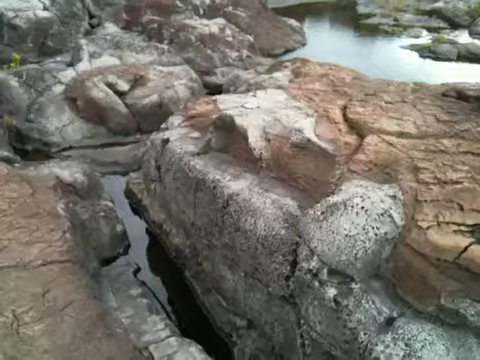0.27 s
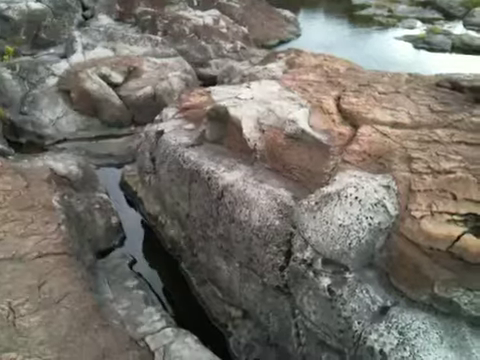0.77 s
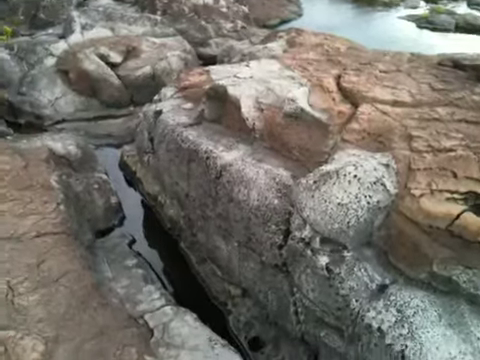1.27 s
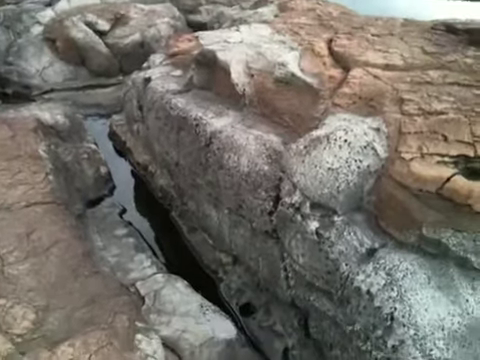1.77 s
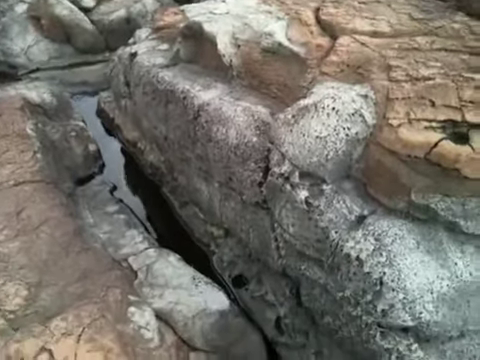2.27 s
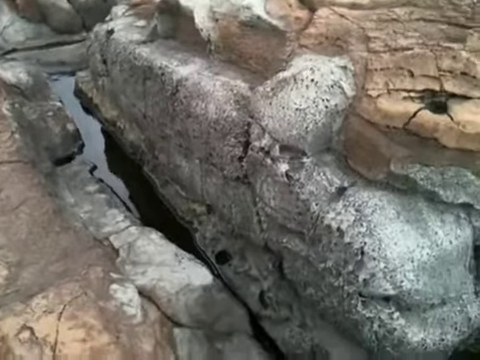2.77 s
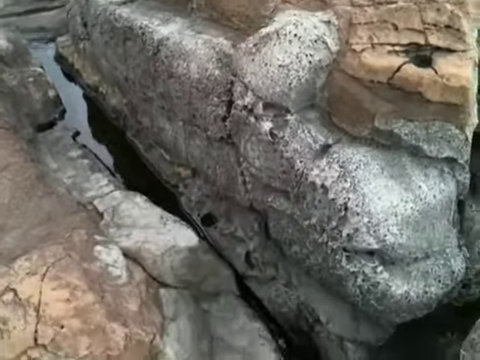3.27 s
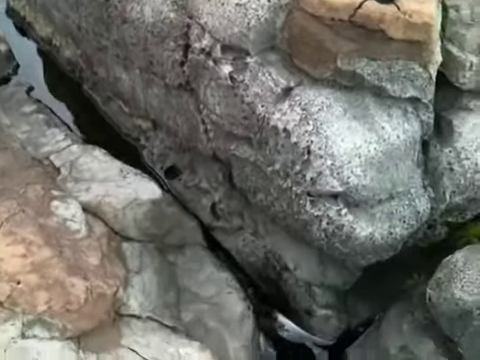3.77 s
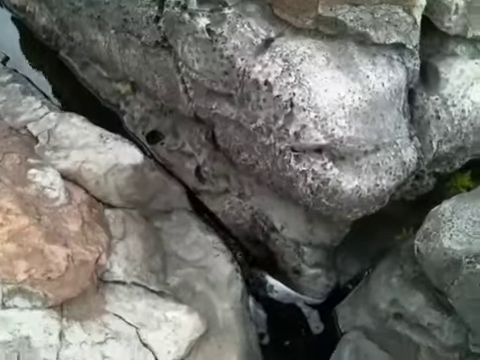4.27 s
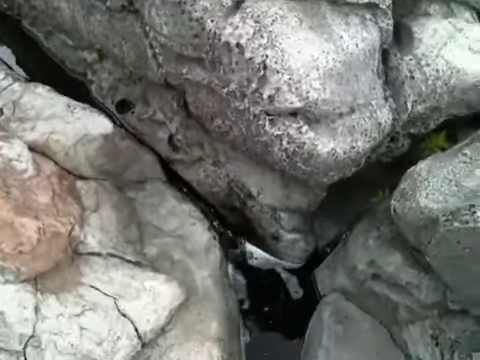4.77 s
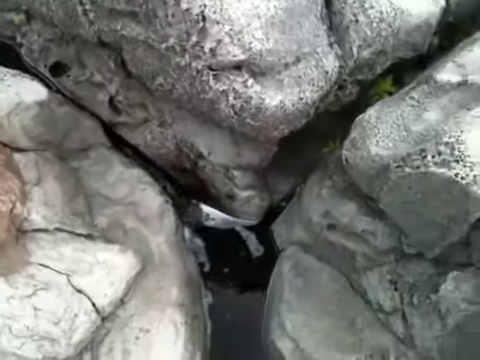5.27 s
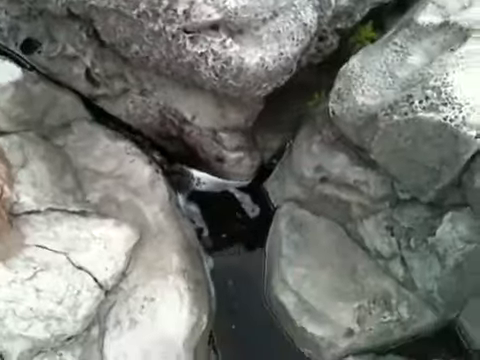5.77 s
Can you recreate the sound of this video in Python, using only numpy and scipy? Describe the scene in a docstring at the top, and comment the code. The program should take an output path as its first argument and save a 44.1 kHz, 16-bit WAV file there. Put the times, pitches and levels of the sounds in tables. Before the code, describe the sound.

Outdoors among shore rocks, a little water gurgles through a gap with high pinging bubbles, lower plops and tiny bright splashes. Low wind rumble comes and goes; a strong gust near the middle batters the unprotected microphone and briefly covers the water. Afterwards shorter bumps return between livelier bursts of gurgling. The sound is close and dry, with a thin watery hiss beneath and no long echo.

```python
"""A narrow rock crevice on an open shore: water trickles through it and a light gusty wind blows.
Wind rumble is moving bands of noise; single eddies are short low swings with ragged noise on them.
Water is a fizz of flickering noise bands, ringing sines for bubbles and noise bursts for drops.
Quick reflections off the rock follow the bubbles and splashes."""
import sys
import numpy as np
from scipy import signal
from scipy.io import wavfile
from scipy.ndimage import uniform_filter1d

SR = 44100
rng = np.random.default_rng(int(sys.argv[2]) if len(sys.argv) > 2 else 0)


def pcm_store(signal):
    """Save signal as 16-bit PCM."""
    levels = np.round(np.clip(np.atleast_2d(signal), -1, 1) * 32767)
    wavfile.write(sys.argv[1], SR, levels.astype(np.int16).T)


N = 266055

# wind strength, as rumble between thumps: time_s, level_db
WIND_STRENGTH = [(0.3, -50.5), (0.6, -51.5), (0.85, -44.5), (1.08, -51), (1.3, -45), (1.55, -48.5),
                 (1.72, -40.5), (1.9, -43.5), (2.2, -49.5), (2.55, -40.5), (2.65, -45), (2.76, -35.5),
                 (2.85, -31), (3.01, -30.5), (3.14, -28), (3.26, -30), (3.31, -40.5), (3.38, -42),
                 (3.75, -47), (3.92, -42.5), (4.0, -47.5), (4.12, -43.5), (4.33, -41), (4.42, -34.5),
                 (4.5, -62), (4.54, -59), (4.6, -35.5), (4.82, -47.5), (5.04, -51), (5.25, -45),
                 (5.45, -43), (5.6, -52.5), (5.81, -40), (6.03, -47.5)]
# spectral shape of the wind rumble: frequency_hz, density_db (per Hz)
RUMBLE_SPECTRUM = [(25, -6), (60, -31), (110, -2.5), (170, -2), (260, -2), (400, -7), (600, -25.5),
                   (1000, -65.5), (1500, -53), (2200, -83)]
# single eddies on the microphone, before its bass cut: height_s, peak_db, pitch_hz, half_length_s
EDDY_THUMPS = [(0.132, -30.5, 159, 0.012), (0.2063, -36.5, 193, 0.0051), (0.2311, -39.5, 171, 0.02),
               (0.3107, -36, 222, 0.0051), (0.4061, -37.5, 162, 0.0032), (0.4231, -31.5, 176, 0.0071),
               (0.4485, -31.5, 170, 0.0034), (0.4717, -43, 164, 0.011), (0.6592, -34, 140, 0.0042),
               (0.6878, -41, 188, 0.007), (0.7649, -38, 181, 0.013), (0.7909, -33, 186, 0.0057),
               (0.8091, -35, 186, 0.0038), (0.8615, -38.5, 180, 0.016), (0.8857, -30.5, 190, 0.003),
               (0.9159, -43, 189, 0.0066), (1.0619, -35, 190, 0.0048), (1.0871, -42, 194, 0.011),
               (1.2245, -31, 252, 0.0054), (1.271, -18, 198, 0.0031), (1.281, -20.5, 191, 0.0017),
               (1.3721, -26, 252, 0.0021), (1.4243, -31, 360, 0.0034), (1.4379, -28, 255, 0.0019),
               (1.4664, -30, 166, 0.0078), (1.5608, -31, 169, 0.0092), (1.5934, -26, 187, 0.0018),
               (1.647, -44, 260, 0.0046), (1.6995, -32, 148, 0.015), (1.7215, -23, 252, 0.0024),
               (1.7444, -23.5, 188, 0.0022), (1.7565, -37, 250, 0.0049), (1.8098, -32.5, 180, 0.0048),
               (1.8923, -28.5, 188, 0.0031), (1.9664, -48, 162, 0.0045), (2.0143, -28.5, 195, 0.0063),
               (2.0277, -33, 219, 0.003), (2.0717, -37, 190, 0.0044), (2.112, -29.5, 216, 0.0032),
               (2.2322, -26.5, 157, 0.0048), (2.343, -26.5, 200, 0.0043), (2.36, -29.5, 194, 0.003),
               (2.4565, -12.5, 228, 0.0022), (2.4866, -19, 255, 0.0017), (2.5005, -24.5, 346, 0.0054),
               (2.5163, -14, 211, 0.0026), (2.5277, -21, 219, 0.003), (2.5873, -13, 193, 0.0018),
               (2.5973, -24, 294, 0.0022), (2.686, -30, 303, 0.0032), (2.715, -21.5, 182, 0.027),
               (2.765, -21.5, 168, 0.0033), (2.782, -20, 200, 0.004), (2.8036, -22, 188, 0.0032),
               (2.8299, -23, 214, 0.008), (2.8401, -4, 199, 0.0027), (2.8519, -29, 219, 0.0018),
               (2.8687, -11, 184, 0.0019), (2.8825, -12, 380, 0.0014), (2.8975, -20, 140, 0.015),
               (2.9395, -17, 182, 0.016), (2.9778, -17, 182, 0.016), (2.9955, -25, 216, 0.0049),
               (3.0061, -8.5, 207, 0.0033), (3.0218, -19, 212, 0.0085), (3.0351, -17, 162, 0.0056),
               (3.0499, -10.5, 188, 0.0044), (3.066, -18, 160, 0.012), (3.0844, -20, 190, 0.013),
               (3.1041, -19, 250, 0.0057), (3.1211, -21.5, 196, 0.015), (3.1401, -21, 257, 0.0034),
               (3.1633, -17, 167, 0.01), (3.1825, -11, 228, 0.0031), (3.1932, -11.7, 202, 0.0025),
               (3.2206, -13, 177, 0.011), (3.2367, -21, 197, 0.0065), (3.2537, -17.5, 170, 0.011),
               (3.286, -18.5, 200, 0.0022), (3.3565, -20.5, 260, 0.0032), (3.341, -24, 200, 0.004),
               (3.378, -25, 250, 0.0022), (3.395, -31, 220, 0.004), (3.4621, -25.5, 187, 0.004),
               (3.5388, -24, 253, 0.0018), (3.5531, -31, 137, 0.016), (3.5916, -28, 188, 0.0038),
               (3.6209, -29, 219, 0.004), (3.6678, -29.5, 159, 0.0075), (3.6955, -26, 219, 0.0026),
               (3.7079, -33, 140, 0.011), (3.7444, -27.0, 185, 0.0075), (3.7558, -24, 257, 0.0011),
               (3.8492, -20, 245, 0.0018), (3.9739, -20, 208, 0.0044), (3.988, -18, 205, 0.0064),
               (4.0166, -9, 363, 0.0011), (4.0265, -24, 169, 0.0083), (4.0556, -26.5, 168, 0.0076),
               (4.246, -15.5, 221, 0.0015), (4.2635, -20, 162, 0.0047), (4.2816, -16, 288, 0.0016),
               (4.3057, -21, 162, 0.0057), (4.3161, -16.5, 192, 0.0066), (4.344, -28, 200, 0.004),
               (4.354, -30, 330, 0.0019), (4.37, -38, 170, 0.006), (4.392, -23.5, 330, 0.0031),
               (4.4095, -35, 226, 0.011), (4.4197, -17.5, 222, 0.0072), (4.4297, -29, 135, 0.0077),
               (4.447, -34, 187, 0.0028), (4.556, -27.5, 303, 0.0041), (4.5717, -18, 162, 0.0069),
               (4.5855, -20.5, 191, 0.0032), (4.602, -22, 188, 0.0019), (4.6184, -15.5, 235, 0.0029),
               (4.6283, -18, 188, 0.001), (4.6655, -21, 190, 0.0041), (4.7308, -21.5, 191, 0.0044),
               (4.771, -30, 160, 0.004), (4.815, -27.5, 147, 0.0051), (4.853, -30, 219, 0.0038),
               (4.875, -41, 200, 0.0026), (4.9893, -25, 216, 0.0029), (5.0628, -33, 192, 0.0068),
               (5.1508, -33.5, 252, 0.0039), (5.171, -33, 138, 0.015), (5.2313, -45, 188, 0.0041),
               (5.2415, -31, 258, 0.008), (5.2517, -22.5, 159, 0.0078), (5.307, -40, 193, 0.0078),
               (5.4184, -33, 220, 0.0025), (5.4345, -26, 294, 0.0023), (5.4474, -38, 187, 0.0048),
               (5.471, -35, 191, 0.0037), (5.6395, -18.5, 295, 0.0015), (5.7229, -15, 185, 0.0039),
               (5.8113, -15.5, 165, 0.0042), (5.8408, -25.5, 218, 0.0035), (5.876, -22, 336, 0.0024),
               (5.8884, -30, 158, 0.012), (5.9073, -24, 192, 0.0035), (5.9626, -25, 160, 0.0046)]
# sharp eddies torn off the microphone's rim, before its bass cut: height_s, peak_db, pitch_hz, half_length_s
RIM_SNAPS = [(1.331, -40, 600, 0.0018), (1.3739, -29.5, 554, 0.0023), (1.4596, -40, 576, 0.0025),
             (1.7229, -32.5, 637, 0.0028), (2.4549, -26.5, 574, 0.0012), (2.455, -36.5, 1100, 0.0039),
             (2.4853, -33, 606, 0.0014), (2.4975, -35, 613, 0.0012), (2.5054, -33, 513, 0.0032),
             (2.5846, -37, 504, 0.0057), (2.7118, -30.5, 520, 0.0028), (2.8159, -27, 517, 0.0031),
             (2.824, -22, 610, 0.0018), (2.8361, -18.5, 490, 0.004), (2.8385, -29, 1480, 0.00085),
             (2.844, -29, 514, 0.011), (2.8576, -26, 610, 0.0028), (2.861, -38, 1180, 0.0014),
             (2.8757, -23.5, 513, 0.0011), (2.8841, -42, 722, 0.0018), (2.9154, -26, 725, 0.0015),
             (2.9272, -21.5, 493, 0.0062), (2.9375, -37, 1280, 0.00053), (2.9376, -18, 710, 0.0014),
             (2.9637, -28, 520, 0.0044), (2.9937, -23, 613, 0.0013), (3.0039, -29.5, 513, 0.0054),
             (3.0152, -21.5, 507, 0.0045), (3.0333, -35, 613, 0.0037), (3.0465, -23, 1600, 0.00021),
             (3.0472, -13, 680, 0.0011), (3.0753, -27, 514, 0.0025), (3.0952, -28, 520, 0.0041),
             (3.1041, -21.5, 596, 0.0019), (3.1254, -24, 617, 0.0011), (3.134, -30, 510, 0.004),
             (3.1512, -40, 505, 0.0023), (3.1594, -14, 487, 0.0014), (3.16, -40, 1200, 0.0011),
             (3.1778, -22.5, 630, 0.0015), (3.1868, -17.5, 482, 0.0044), (3.1989, -34, 500, 0.0047),
             (3.2193, -11.5, 564, 0.00087), (3.2195, -34, 1280, 0.0043), (3.2272, -22, 610, 0.0014),
             (3.242, -15.5, 570, 0.0011), (3.243, -41, 1150, 0.0007), (3.2592, -34, 610, 0.0019),
             (3.4601, -33.5, 526, 0.0036), (3.984, -32, 980, 0.00068), (3.9857, -17, 495, 0.0045),
             (3.9937, -19, 630, 0.0017), (4.0172, -20, 600, 0.0019), (4.2431, -37, 613, 0.0026),
             (4.2569, -27, 490, 0.002), (4.2651, -30.5, 600, 0.0013), (4.2762, -40, 610, 0.0028),
             (4.3107, -44, 520, 0.0051), (4.3188, -30, 484, 0.0022), (4.3918, -34, 590, 0.0024),
             (4.4156, -34, 585, 0.0032), (4.5753, -32, 507, 0.0034), (4.5832, -27.5, 620, 0.0008),
             (4.6145, -28, 477, 0.0022), (4.6245, -27.5, 504, 0.0017), (5.0168, -33.5, 486, 0.0016),
             (5.6392, -28, 605, 0.0014), (5.7213, -33, 676, 0.0012), (5.8066, -40, 550, 0.0042),
             (5.8401, -33, 607, 0.002), (5.8769, -31, 584, 0.0035)]
# strength of the trickle: time_s, level_db
FLOW_STRENGTH = [(0.15, -52), (0.7, -52), (1.5, -52.5), (2.58, -50.5), (3.0, -51), (3.7, -50.5),
                 (4.48, -49), (5.2, -50.5), (6.03, -49.5)]
# spectral shape of the fizz: frequency_hz, density_db (per Hz)
FIZZ_SPECTRUM = [(290, -31), (500, 0.5), (810, -2.5), (980, 8.5), (1330, -13), (1640, -5), (4760, -12),
                 (7060, -30.5), (10500, -21), (15300, -37), (16500, -40)]
# level of small bubbles by pitch: pitch_hz, level_db
SMALL_BUBBLE_LEVEL = [(500, -22), (850, -33), (1220, -16), (1700, 1.5), (3000, 2), (5000, 6), (7000, -2.5)]
# loud bubbles: start_s, level_db (of the ringing tone), pitch_hz (at the start)
LOUD_BUBBLES = [(0.225, -45, 2700), (0.285, -39.5, 1570), (0.336, -33.5, 1960), (0.349, -35, 4130),
                (0.358, -36, 2120), (0.3635, -33.5, 3870), (0.413, -36, 1770), (0.4335, -35, 900),
                (0.4466, -37, 1850), (0.4925, -37.5, 1030), (0.554, -40, 1010), (0.45, -38, 920),
                (0.6246, -34, 2600), (0.711, -35, 1580), (0.733, -32.5, 1530), (0.734, -36, 2210),
                (0.762, -36, 3500), (0.794, -39, 4500), (0.843, -31.5, 1230), (0.882, -42, 2800),
                (0.973, -40, 5000), (0.978, -46, 2050), (0.906, -31, 3600), (0.9063, -34, 980),
                (0.946, -32.5, 3700), (1.038, -37, 880), (1.094, -33.5, 2550), (1.108, -36, 2070),
                (1.115, -42, 1980), (1.126, -45, 1700), (1.134, -39, 1600), (1.177, -50, 2700),
                (1.2023, -40, 995), (1.203, -37.5, 4350), (1.217, -41, 3400), (1.269, -33, 4020),
                (1.295, -35, 3470), (1.472, -41, 2520), (1.492, -43, 1880), (1.52, -36, 2550),
                (1.607, -37, 2570), (1.659, -41, 4900), (1.679, -40, 3660), (1.768, -41, 4830),
                (1.513, -34.5, 3160), (1.555, -37.5, 1210), (1.606, -38, 1420), (1.698, -31.5, 1155),
                (1.756, -39.5, 890), (1.829, -43, 1250), (1.872, -42, 1220), (1.947, -36, 1050),
                (2.018, -35.5, 1680), (2.066, -33, 2220), (2.081, -29, 4420), (2.163, -28.5, 5400),
                (2.167, -33.5, 1890), (2.269, -33.5, 2160), (2.298, -22, 4490), (2.388, -31.5, 2560),
                (2.658, -30.5, 2220), (2.81, -36, 2560), (3.032, -34, 2040), (3.481, -29.5, 5110),
                (3.625, -31, 1160), (3.672, -34.5, 3390), (3.757, -34.5, 1370), (3.842, -32, 1140),
                (3.8453, -32, 5200), (4.04, -32, 2030), (4.089, -30.5, 2030), (4.164, -31, 4420),
                (4.251, -27, 3910), (4.315, -30, 4050), (4.3778, -27, 5000), (4.399, -30, 1235),
                (4.423, -30, 1260), (4.44, -34.5, 910), (4.4426, -23.5, 5160), (4.544, -36, 1190),
                (4.5034, -22, 4860), (4.567, -31.5, 4300), (4.553, -34, 4200), (4.599, -37, 3930),
                (4.395, -41, 4140), (4.648, -36.5, 1230), (4.698, -28.5, 1000), (4.7019, -20, 1170),
                (4.752, -33, 4130), (4.806, -34.5, 3880), (4.851, -33, 1125), (4.877, -41, 1160),
                (4.919, -44, 1140), (4.966, -32.5, 1270), (5.031, -38, 770), (5.117, -41, 1170),
                (5.167, -38, 740), (5.01, -32.5, 3830), (5.085, -29.5, 1520), (5.113, -33.5, 4460),
                (5.26, -39, 3800), (5.282, -37, 2900), (5.078, -33.5, 2110), (5.183, -34.5, 1156),
                (5.333, -30, 1384), (5.384, -36.5, 960), (5.441, -35, 5040), (5.513, -26.5, 4850),
                (5.521, -30, 1540), (5.569, -36, 1260), (5.676, -28.5, 4540), (5.701, -35.5, 1280),
                (5.743, -31, 3520), (5.857, -35, 1180), (5.878, -35, 1260), (5.765, -33.5, 4690),
                (5.883, -31.5, 5370), (5.897, -21.5, 1116), (5.914, -28.5, 3210), (5.969, -31.5, 3980)]
# loud splashes of drops on rock: start_s, level_db (before band-passing), pitch_hz (within the bright band)
LOUD_SPLASHES = [(0.219, -58, 11000), (0.35, -45, 12000), (0.36, -44, 11000), (0.404, -39, 8600),
                 (0.744, -36, 10100), (0.823, -35, 9400), (0.9066, -33, 10400), (1.0377, -30.5, 8800),
                 (1.095, -36.5, 8950), (1.2545, -28, 9700), (1.4202, -29, 8800), (1.557, -35.5, 8300),
                 (1.703, -36.5, 9150), (1.7623, -42, 8900), (1.995, -27.5, 9900), (2.054, -42, 11500),
                 (2.067, -31, 8550), (2.192, -38, 9000), (2.161, -26.5, 9800), (2.296, -35, 8200),
                 (2.388, -37, 8750), (2.4386, -25.5, 8900), (2.845, -33.5, 9000), (3.047, -33, 6350),
                 (3.088, -40, 11200), (3.2032, -30, 8900), (3.2853, -28, 8950), (3.481, -35.5, 9100),
                 (3.621, -27, 11200), (3.733, -37, 10300), (4.06, -37, 10300), (4.243, -31, 7100),
                 (4.29, -41, 13500), (4.301, -40, 12000), (4.366, -34, 13500), (4.354, -35.5, 9500),
                 (4.375, -37, 6760), (4.441, -29, 9400), (4.502, -34, 9250), (4.556, -35, 7800),
                 (4.624, -35, 9000), (4.72, -38, 9900), (4.759, -31, 7860), (5.01, -39, 8000),
                 (5.2955, -29.5, 9100), (5.524, -41, 13400), (5.554, -28.5, 13900), (5.637, -30, 10100),
                 (5.709, -39, 11500), (5.766, -46, 9500), (5.814, -42, 9500), (5.8826, -30, 9600),
                 (5.9, -48, 8000), (5.913, -40, 10300), (5.941, -40, 11000), (5.996, -37, 11060)]

START_S, CUTOFF_HZ = .1195, 15900   # silence before this time; top of the spectrum
FAINT_THUMP_DB, FAINT_SPREAD_DB = 2, 1.5   # random eddies: offset from the wind strength, spread of sizes
TEAR_DB, TEAR_S = -9, .0012   # tearing noise: level re a rim snap before band-passing, extra half length
LOPSIDED, PORT_CUT_HZ = 0.44, 75   # phase bend that peaks a swing (radians); microphone's bass cut
BUBBLE_T60_S, RING_BY_SIZE = 0.033, 0.55   # loud bubbles: ring scale at 1 kHz, power of pitch shortening it
BUBBLE_ROUGH = 0.012   # least random phase step, cycles per sample
SNAP_DB, SNAP_S = -12, 0.00031   # tick at a loud bubble's or plop's birth: level re the tone; any tick's decay
SPLASH_T60_S = 0.0095   # loud splashes
PLOPS, PLOP_HZ, PLOP_OCTAVES = 28, 1158, 0.6   # pairs of gulps: count, centre of first pitch, full range
PLOP_DB, PLOP_T60_S = 9, 0.057   # offset re the flow before chance sizes, ring time
CLUSTER_DB, CLUSTER_HZ = 4, 17   # common level swing of small water: greatest swing, corner of its drift


def from_db(db):
    """Amplitude ratio of a level in decibels."""
    return 10 ** (np.asarray(db) / 20)


def rms_one(x):
    """Scales a signal to unit effective value."""
    return x / np.sqrt(np.mean(x ** 2) + 1e-20)


def in_time(rows):
    """Linear interpolation of a level at every sample."""
    s, value = np.transpose(rows)
    return np.interp(np.arange(N) / SR, s, value)


def at_hz(points, hz):
    """Interpolation of a level along logarithmic frequency."""
    table = np.array(points)
    return np.interp(np.log(hz), np.log(table[:, 0]), table[:, 1])


def band(x, low_hz, high_hz):
    """Band-pass filtering, with the upper edge kept below half the sample rate."""
    edges = [low_hz, min(high_hz, SR * .45)]
    return signal.sosfilt(signal.butter(2, edges, "band", fs=SR, output="sos"), x)


def drift(rate_hz):
    """Slow chance of unit rms: noise at every 20th sample through a double one-pole low-pass."""
    r = np.exp(-40 * np.pi * rate_hz / SR)
    noise = rng.standard_normal(N // 20 + 2002)
    slow = signal.lfilter([1], [1, -2 * r, r * r], noise)[2000:]   # drop the filter's build-up
    return np.interp(np.arange(N) / 20, np.arange(len(slow)), rms_one(slow))


def add(out, s, sound):
    """Superposition of a short sound from time s."""
    i = max(round(s * SR), 0)
    out[i:i + len(sound)] += sound[:max(N - i, 0)]


def banded_noise(spectrum, first_hz, count, gain_db):
    """Spectral shaping: half-octave noise bands under moving gains, with unit spread at 0 dB gain."""
    white = rng.standard_normal((2, N))   # alternated, so neighbouring bands use different noise
    edges = first_hz * 2 ** (np.arange(count + 1) / 2)
    still, moving = np.zeros(N), np.zeros(N)
    for k, (low_hz, high_hz) in enumerate(zip(edges, edges[1:])):
        hz = np.sqrt(low_hz * high_hz)
        noise = band(white[k % 2], low_hz, high_hz)
        shape_db = at_hz(spectrum, hz)
        still += from_db(shape_db) * noise
        moving += from_db(shape_db + gain_db(hz)) * noise
    return moving / np.std(still)


def rumble(lumpy_db, own_db, brighten, bass_share):
    """Turbulence comes in lumps: the stronger the wind, the more its noise tilts towards high frequencies."""
    strength_db = in_time(WIND_STRENGTH) + lumpy_db * np.tanh(drift(23))
    tilt = brighten * (strength_db + 30.5)   # dB per octave about 200 Hz

    def level_db(hz):
        share = 1 if hz > 200 else bass_share
        return strength_db + tilt * np.log2(hz / 200) * share + own_db * drift(11.6)

    return banded_noise(RUMBLE_SPECTRUM, 25.97, count=13, gain_db=level_db)


def faint_thumps():
    """Random turbulence: weaker eddies at chance moments, their sizes following the wind strength."""
    when, size, pitch, length = rng.random((90, 4)).T
    s = when * N / SR
    wind_db = np.interp(s, *np.transpose(WIND_STRENGTH))
    db = wind_db + FAINT_THUMP_DB - FAINT_SPREAD_DB * np.log(np.maximum(size, .05))
    hz = 140 * 3.5 ** pitch
    half_length_s = (.5 + 2.3 * length) / hz
    return list(zip(s, db, hz, half_length_s))


def thumps(rows, tear_db):
    """Pressure on a diaphragm: an eddy swings it under a bell-shaped swell, with ragged brighter noise."""
    out, tears = np.zeros(N), np.zeros(N)
    t = np.arange(-SR // 40, SR // 40) / SR
    chances = rng.random((len(rows), 2))
    noises = rng.standard_normal((len(rows), len(t)))
    for (s, db, hz, length), (phase, sag), noise in zip(rows, chances, noises):
        cycles = hz * t * (1 - 32.0 * (sag - .5) * t)   # pitch slides either way
        width_s = np.clip(length * np.where(t < 0, 0.9, 1.15), .0003, .012)
        swell = np.exp(-(t / width_s) ** 2)
        turn = 2 * np.pi * (cycles + 0.24 + 0.37 * (phase - .5))
        turn = turn + np.pi * (sag > .5)   # inward or outward
        swing = np.sin(turn + LOPSIDED * swell * np.sin(turn + 7 * phase))
        add(out, s + t[0], from_db(db) * swell * swing)
        tear_swell = np.exp(-(t / (length + TEAR_S)) ** 2)
        add(tears, s + t[0], from_db(db + tear_db) * tear_swell * np.sign(noise))
    bass_cut = signal.butter(2, PORT_CUT_HZ, "high", fs=SR, output="sos")
    return signal.sosfilt(bass_cut, out + 1e-18) + band(band(tears, 840, 1050), 380, 2200)


def fizz(flow_db, patchy_db):
    """Superposition of countless tiny bubbles: they merge into a hiss whose treble flickers."""
    together = drift(19)

    def level_db(hz):
        flicker = 0.73 * together + 1.47 * drift(32.5)
        return flow_db + patchy_db * np.log2(hz / 400) * flicker

    return banded_noise(FIZZ_SPECTRUM, 474.6, count=10, gain_db=level_db)


def bubble(db, hz, t60, climb, snap_db=SNAP_DB):
    """Damped resonance: a quick swell and dying sine, its pitch gliding by climb, raggeder when high."""
    t60 = np.clip(t60, .004, .08)
    t = np.arange(int(t60 * SR)) / SR
    swell = 1 - np.exp(-(t / (0.052 * t60)) ** 2)
    step = BUBBLE_ROUGH + .022 * (hz / 4000) ** 2   # cycles per sample
    wobble = np.cumsum(rng.standard_normal(3600)[:len(t)]) * step
    cycles = hz * t * (1 + climb * t / t60) + wobble
    tone = from_db(-60 * t / t60) * swell * np.sin(2 * np.pi * cycles)
    # the neck pinches off with a tick an octave up
    snap = from_db(snap_db) * np.exp(-t / SNAP_S) * np.cos(2 * np.pi * 2 * hz * t)
    return from_db(db) * (tone + snap)


def splash(db, hz, t60, noise, broad, octaves, tick):
    """Impact radiation: a breaking drop gives a sharp burst of bright noise that dies fast."""
    t = np.arange(len(noise)) / SR
    body = (1 - np.exp(-t / 0.00036)) * from_db(-60 * t / max(t60, .003))
    burst = noise * (body + tick * np.exp(-t / 0.000063))
    bright = band(burst, hz / 2 ** (0.9 * octaves), hz * 2 ** (0.44 * octaves)) / np.sqrt(octaves)
    treble = burst - uniform_filter1d(burst, size=13)   # less its moving average
    return from_db(db) * (bright + broad * treble)


def small_water(flow_db, bubble_db, splash_db, ring_s):
    """Random superposition: faint bubbles, plops and droplets, levels spread exponentially up to a limit."""
    out = np.zeros(N)
    for when, pitch, size, climb, life in rng.random((1700, 5)):
        hz = 600 * 11 ** pitch
        db = bubble_db + at_hz(SMALL_BUBBLE_LEVEL, hz) - 1.7 * np.log(max(size, .12))
        t60 = ring_s * (.25 + life ** 2) * (1000 / hz) ** .75   # low pitches ring longer
        add(out, when * N / SR, bubble(db, hz, t60, .5 * climb ** 2 - .12, snap_db=-18))

    for when, pitch, size, delay in rng.random((PLOPS, 4)):   # the pool gulps in pairs
        s = when * N / SR
        hz = PLOP_HZ * 2 ** (PLOP_OCTAVES * (pitch - .5))
        db = PLOP_DB - 1.3 * np.log(max(size, .08))
        add(out, s, bubble(db, hz, PLOP_T60_S, 0.026))
        second = bubble(db - 16.0, hz * (0.71 + .5 * delay), PLOP_T60_S, 0.096)
        add(out, s + 0.0059 + 0.026 * delay, second)

    chances, noises = rng.random((600, 4)), rng.standard_normal((600, SR // 50))
    for (when, pitch, size, life), noise in zip(chances, noises):
        db = splash_db - 2.2 * np.log(max(size, .08))
        hz, t60 = 4500 * 3.2 ** pitch, 0.0068 + 0.028 * life
        drop = splash(db, hz, t60, noise, broad=0.025, octaves=0.34 + 0.65 * size, tick=0.05)
        add(out, when * N / SR, drop)
    return from_db(flow_db + CLUSTER_DB * np.tanh(drift(CLUSTER_HZ))) * out


def loud_water():
    """Resonance and impact: the bubbles and splashes that stand out."""
    out = np.zeros(N)
    for (s, db, hz), (climb, life) in zip(LOUD_BUBBLES, rng.random((len(LOUD_BUBBLES), 2))):
        t60 = BUBBLE_T60_S * (1000 / hz) ** RING_BY_SIZE * (0.8 + 0.51 * life)
        add(out, s, bubble(db, hz, t60, 0.025 + 0.34 * climb))
    noises = rng.standard_normal((len(LOUD_SPLASHES), SR // 25))
    for (s, db, hz), noise in zip(LOUD_SPLASHES, noises):
        add(out, s, splash(db, hz, SPLASH_T60_S, noise, broad=0.075, octaves=0.87, tick=1.0))
    return out


def crevice(x, echo_db):
    """Early reflection: rock walls return three quick, weaker copies."""
    out = x.copy()
    for s, db in [(.0023, -24), (.0047, -1), (.0079, -4.5)]:
        add(out, s, from_db(db + echo_db) * x)
    return out


def scene():
    """Superposition of wind at the microphone and water in the crevice."""
    wind = rumble(lumpy_db=6.0, own_db=2.5, brighten=0.24, bass_share=0.94)
    wind = wind + thumps(EDDY_THUMPS + faint_thumps(), tear_db=-22.0)
    wind = wind + thumps(RIM_SNAPS, tear_db=TEAR_DB)
    flow_db = in_time(FLOW_STRENGTH)
    hiss = from_db(-5.5) * fizz(flow_db, patchy_db=0.863)
    grains = small_water(flow_db, bubble_db=3, splash_db=-2.5, ring_s=0.061) + loud_water()
    water = crevice(grains, echo_db=-17.0) + hiss
    return (water + wind)[None]


def record(dry):
    """Band limitation: the lowest bass and the top are cut, with silence until START_S."""
    bass_cut = signal.butter(3, 68, "high", fs=SR, output="sos")
    top_cut = signal.ellip(8, .3, 70, CUTOFF_HZ, fs=SR, output="sos")
    x = signal.sosfilt(bass_cut, dry) * (np.arange(N) >= START_S * SR)
    return signal.sosfilt(top_cut, x)


dry = scene()
out = record(dry)
pcm_store(out)
```